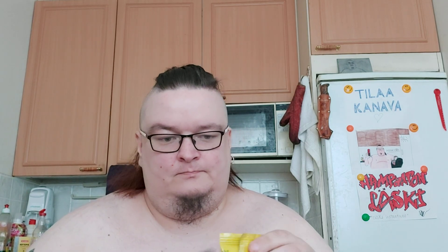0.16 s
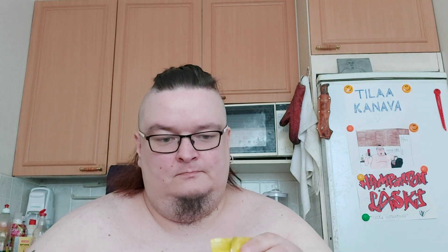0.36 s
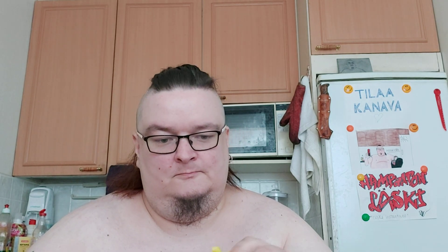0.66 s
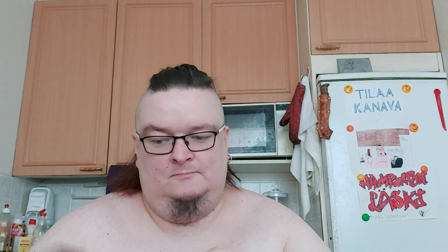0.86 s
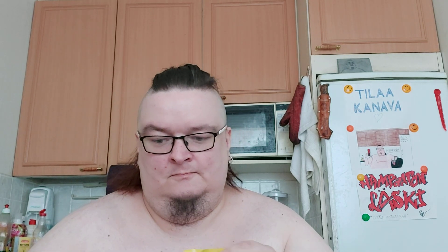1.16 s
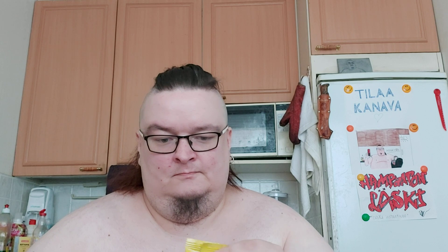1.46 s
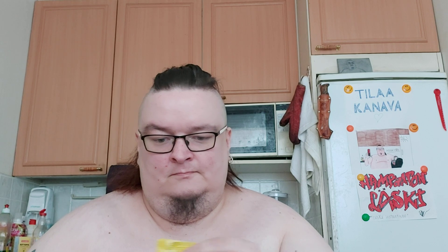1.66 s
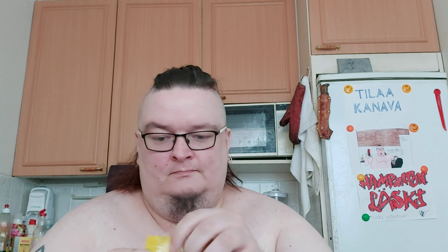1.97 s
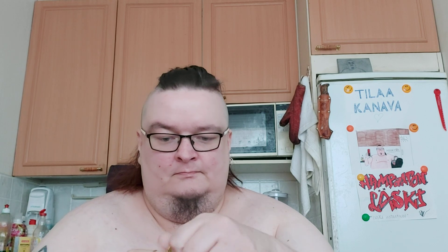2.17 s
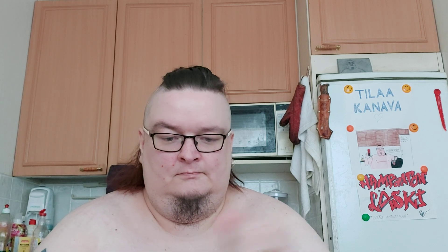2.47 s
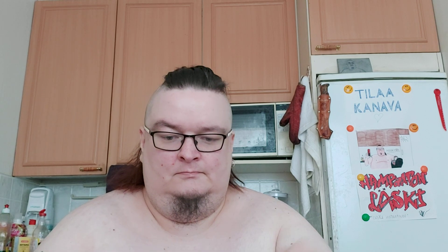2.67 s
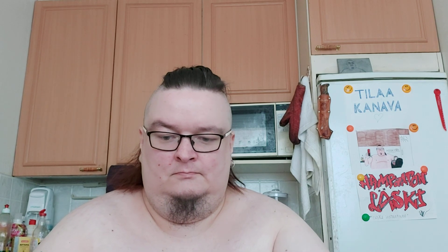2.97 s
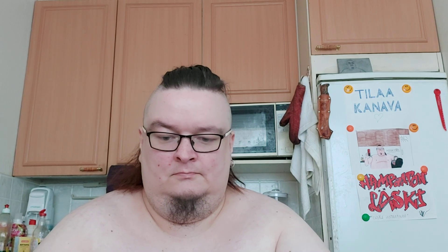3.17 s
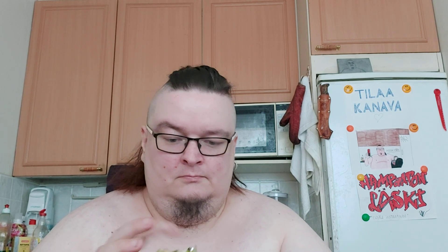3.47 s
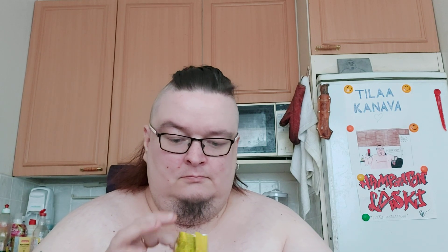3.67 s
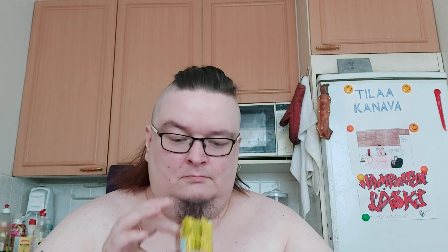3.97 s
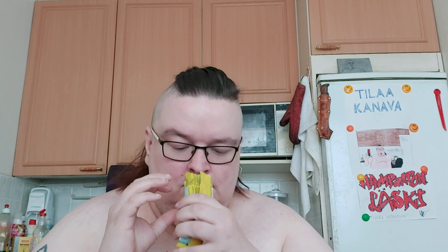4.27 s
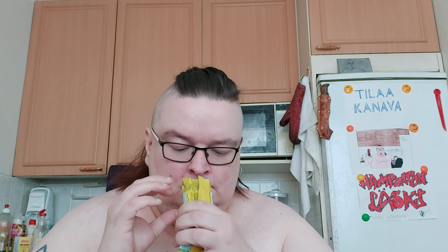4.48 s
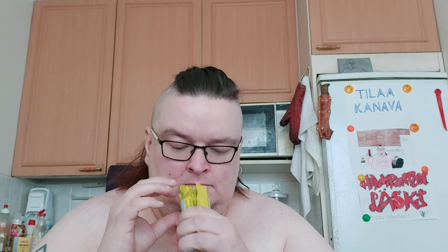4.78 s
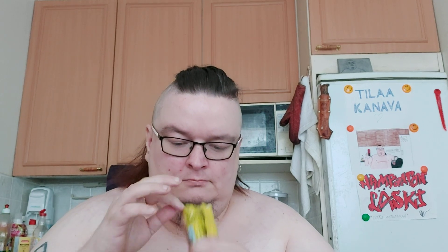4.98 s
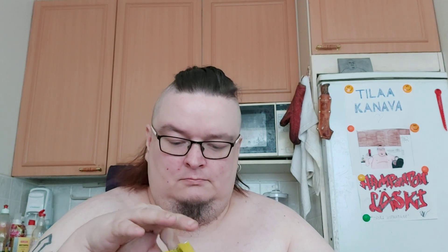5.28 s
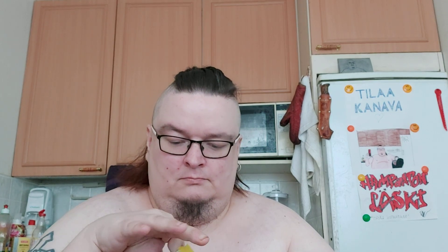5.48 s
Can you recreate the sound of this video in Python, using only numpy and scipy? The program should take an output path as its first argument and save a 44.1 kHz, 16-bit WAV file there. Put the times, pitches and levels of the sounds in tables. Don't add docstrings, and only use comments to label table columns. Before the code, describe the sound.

A plastic snack wrapper crackles and snaps close by as it is cut and torn open, with a knife clunking onto the table.

```python
import sys
import numpy as np
from scipy import signal
from scipy.fft import rfft, irfft, next_fast_len
from scipy.io import wavfile
from scipy.ndimage import uniform_filter1d, map_coordinates

SR = 44100
rng = np.random.default_rng(int(sys.argv[2]) if len(sys.argv) > 2 else 0)


def output_pcm(signal):
    pcm = np.clip(np.atleast_2d(signal).T, -1, 1) * 32767
    wavfile.write(sys.argv[1], SR, np.round(pcm).astype(np.int16))


def ratio(d):
    e = np.asarray(d, float) / 20
    return 10 ** e


N = 247968

# t/s, level/dB
FRIDGE_LEVEL = [(0.0, -58), (0.7, -53), (2.0, -54), (4.57, -52.5), (5.29, -52), (5.62, -46.5)]
# f/Hz, density/(dB per Hz)
DRONE_SPECTRUM = [(38, -48.5), (65, -10.5), (102, -22.5), (162, -9), (327, -11), (361, -4), (480, -39),
                  (1060, -120)]
# f/Hz, density/(dB per Hz)
AIR_SPECTRUM = [(260, -35.5), (450, -3), (1050, -3), (2000, -9.5), (3000, -16.5), (4500, -43), (8000, -34),
                (16000, -42.5)]
# t/s, level/dB
SQUEEZE_LEVEL = [(0.1, -60), (0.39, -57), (0.66, -48), (0.78, -36), (0.95, -39), (1.08, -64.5), (1.42, -43),
                 (1.67, -76.5), (2.08, -50.5), (2.44, -36), (2.63, -42.5), (3.2, -59.5), (3.46, -48.5),
                 (3.7, -58), (3.84, -61), (4.29, -66.5), (5.37, -54), (5.62, -42.5)]
# f/Hz, density/(dB per Hz)
FILM_SPECTRUM = [(500, -41.5), (900, -8.5), (1250, -8.5), (1900, -3), (4500, -5.5), (7000, -8),
                 (11000, -28.5), (16000, -31)]
# f/Hz, density/(dB per Hz)
FIZZ_SPECTRUM = [(4000, -50.5), (6200, -15), (7600, 5), (9000, 2.5), (12000, 3.5), (15500, -2),
                 (17000, -54)]
# f/Hz, bandwidth/Hz, level/dB
PACK_MODES = [(260, 290, -4), (374.5, 212, 8.5), (501, 153, 10.5), (780, 370, 2), (1120, 240, -2.5)]
# t/s, level/dB
GRIP_LEVEL = [(0, -0.5), (.6, 0.5), (.8, -7.5), (1.3, -0.5), (2.5, -3), (4, -2), (5.62, -3)]
# t/s, peak level/dB, facet f/Hz, fizz level/dB
CUTTING_SNAPS = [(0.0288, -44, 2580, -16.5), (0.0427, -44, 6890, 13), (0.0718, -26.5, 6600, 7),
                 (0.0834, -36.5, 5000, 1), (0.0887, -30.5, 1870, -8.0), (0.1005, -35, 1810, -11),
                 (0.2061, -41, 4500, 6), (0.2524, -39, 1200, 2), (0.2766, -45.5, 1510, -12),
                 (0.298, -30.0, 5120, 2), (0.3023, -30.5, 5040, 7.0), (0.3113, -36.5, 2760, -5),
                 (0.3889, -35.5, 1510, -4), (0.4078, -35, 3270, -3), (0.4323, -21.5, 4500, 1.5),
                 (0.4402, -31, 3920, 5), (0.4879, -23, 1730, 0.5), (0.5013, -23.5, 1850, 4),
                 (0.511, -24.5, 1890, -4), (0.5147, -23.5, 1680, -16), (0.52, -23, 1700, 1.5),
                 (0.5271, -25.5, 1580, -8.0), (0.5487, -25.5, 2440, -1), (0.5528, -26, 3190, 3),
                 (0.5737, -29, 4350, 7), (0.586, -25, 1620, -6), (0.6147, -36, 3100, -16),
                 (0.6324, -12.5, 1630, -4), (0.6408, -28.5, 1365, -9.5), (0.6604, -22.5, 1470, -3),
                 (0.6783, -21, 3060, -7), (0.708, -35, 3170, -9), (0.7311, -21, 1850, -7),
                 (0.7384, -25, 3320, -2.5), (0.754, -17, 2560, -6.0), (0.7685, -16, 3880, 2),
                 (0.7775, -12, 2850, -15), (0.7827, -15, 4900, 6), (0.7886, -8.5, 1800, -7.0),
                 (0.7975, -11.5, 1860, 4), (0.8092, -10.0, 2590, -5.5), (0.8117, -9, 3320, -10.5),
                 (0.8198, -17.0, 2200, -5), (0.8276, -23, 2000, 2), (0.8357, -19.5, 1770, 4.5),
                 (0.847, -16, 1756, -0.5), (0.864, -19, 1930, 5), (0.871, -21.5, 6160, -1.5),
                 (0.8922, -23.0, 2850, -7)]
# t/s, peak level/dB, facet f/Hz, fizz
# level/dB
HANDLING_SNAPS = [(0.9098, -27.5, 1870, -10.5), (0.9172, -20.5, 2890, -8.5), (0.9318, -26.5, 2280, -7.0),
                  (0.9401, -25, 2365, -11.5), (0.9449, -27.5, 2170, -2), (0.9499, -25.5, 1884, -12),
                  (0.9613, -21, 3190, -15), (0.9815, -29.5, 1770, -13), (1.0106, -21.5, 5350, -4.5),
                  (1.0284, -27, 3750, -5.5), (1.0343, -25, 2160, -5), (1.0615, -30, 1570, -8),
                  (1.0801, -31, 3190, -4), (1.0895, -27.5, 1970, -7), (1.1115, -26.5, 2880, -13),
                  (1.2106, -35.5, 1450, -12), (1.3001, -26.5, 2710, -8), (1.3088, -38, 2760, -17),
                  (1.314, -34, 2790, 5.5), (1.3311, -24, 1186, -14), (1.3473, -22, 1590, -19),
                  (1.3531, -31, 1600, -5), (1.3662, -16, 1790, -0.5), (1.3736, -30.5, 1493, 1.5),
                  (1.5809, -41, 1770, -15), (1.662, -27.5, 1850, -7.5), (1.6811, -37.0, 1210, -10.5),
                  (1.6963, -26, 1660, -3), (1.8164, -28.0, 3920, -4), (1.8249, -48, 3920, -6.0),
                  (1.8381, -28.0, 2650, -2.5), (1.8462, -30.5, 2070, -11.0), (1.8561, -32.5, 3620, -9),
                  (1.8696, -26.5, 1707, -9.5), (1.8819, -22, 3210, -2), (1.8911, -17, 1980, -1.5),
                  (1.9, -20, 3660, -2.5), (1.9081, -23.5, 2210, 2.5), (1.9183, -13, 1740, -5.5),
                  (1.9236, -21, 3460, -5.5), (1.9306, -12.5, 5020, -5.5), (1.9406, -29, 2510, -3.5),
                  (1.97, -24.5, 1680, -3.5), (1.9778, -32, 3360, -5), (1.993, -25.5, 4590, -3.5),
                  (1.9994, -18, 6000, -4), (2.0064, -31, 2230, -5), (2.0188, -29, 2780, -13.5),
                  (2.0255, -22.5, 4670, -9),
                  (2.0425, -29.5, 5080, -14), (2.054, -35.5, 3170, 0), (2.058, -29.5, 1764, -6.5),
                 (2.069, -21.5, 2850, -10), (2.074, -26.5, 4920, 1), (2.1208, -37, 1677, -4.5),
                 (2.1255, -28, 1735, -11), (2.1436, -24.5, 2010, -18), (2.1522, -23, 1780, 0),
                 (2.175, -32, 6160, -2.5), (2.1856, -22.5, 2510, -1), (2.1928, -20.5, 2530, -3.5),
                 (2.199, -28.5, 6950, 9.5), (2.221, -23, 2370, 5), (2.2323, -15, 6180, -8),
                 (2.2396, -28.5, 5300, 4), (2.25, -17.5, 2870, -1), (2.2598, -21.5, 2780, -9),
                 (2.2683, -21.5, 2000, -1), (2.276, -20, 2240, 1.0), (2.2986, -20, 2890, -6.5),
                 (2.3117, -20, 2630, -3.5), (2.337, -34.0, 5680, 16), (2.3733, -22, 1865, -16),
                 (2.3783, -26, 2620, -3.5), (2.3889, -21.5, 2970, 0.5), (2.4012, -25.5, 4530, -5),
                 (2.4208, -20.5, 5510, 3.5), (2.4301, -21.0, 4610, 0), (2.4483, -29, 5470, 3.5),
                 (2.4606, -36, 2530, -6.5), (2.4941, -9, 1970, -1.5), (2.506, -11, 1940, 0.5),
                 (2.5102, -9.5, 1844, -16), (2.523, -4.5, 4180, 0), (2.5323, -21, 2500, -4.5),
                 (2.5411, -28.5, 2000, -3.5), (2.552, -8.5, 1700, -5), (2.5602, -11.5, 5040, 2),
                 (2.5699, -17.5, 2860, 4), (2.731, -34, 3460, 6.5), (2.7458, -32, 5000, 3),
                 (2.7583, -40, 2720, -8), (2.766, -27, 1890, -18.5), (2.776, -30.5, 1830, -6.0),
                 (2.7971, -45.5, 2000, -2.5), (2.8142, -32, 4240, -9), (2.8253, -35.5, 1560, 5),
                 (2.8384, -33, 2740, 1),
                  (2.8634, -40, 4220, 3), (2.8682, -30, 2770, -9.5), (2.8736, -29.5, 6660, 8),
                 (2.8858, -24.5, 5440, 5), (2.8957, -35, 5680, 3), (2.902, -26.5, 7000, 7.5),
                 (2.911, -37, 5990, 0), (2.976, -41, 1384, 0), (2.987, -31.5, 6300, 3.5),
                 (3.028, -33.5, 1610, -22), (3.0693, -37.0, 1810, -9), (3.096, -38, 1640, 5),
                 (3.1787, -33.5, 3350, 3), (3.202, -37.5, 1465, 2.5), (3.2094, -37, 6980, 1),
                 (3.226, -33.5, 2840, -10), (3.2344, -24.5, 4220, 0.5), (3.243, -39.5, 5600, -4.5),
                 (3.2678, -33.5, 1890, -5.5), (3.3246, -42, 1820, -20), (3.3438, -28.5, 1900, -11),
                 (3.3527, -30, 1980, -2), (3.363, -27.5, 1850, -3.5), (3.3745, -20, 1810, -7.5),
                 (3.3795, -18.5, 1854, -6), (3.3873, -26, 1920, -7.5), (3.4051, -23.5, 1834, -20),
                 (3.4156, -15, 4780, -7.5), (3.4259, -26, 4400, -7), (3.4316, -19.5, 6000, 0.0),
                 (3.439, -25, 1600, -17), (3.4702, -29.5, 2630, -18), (3.4818, -22.0, 1953, -13.5),
                 (3.4953, -17, 1910, -10), (3.5051, -23, 1865, -1.5), (3.5169, -19.5, 1785, -1),
                 (3.525, -29.5, 2104, -14), (3.5417, -33, 1720, -12.5), (3.5488, -31, 1825, -14),
                 (3.5732, -24.5, 1850, -4), (3.6, -28.5, 1824, -22), (3.6079, -36, 1880, -28),
                 (3.6181, -23, 1690, -5), (3.6276, -28, 1790, -6), (3.634, -22.5, 1900, -3.5),
                 (3.651, -31, 2020, -6.0), (3.66, -22.5, 1866, -10), (3.6668, -30, 1323, -17.5),
                 (3.678, -31.5, 1890, -19),
                  (3.6898, -16, 1890, 2), (3.7011, -17.5, 2150, -4), (3.7137, -20.5, 1420, -5),
                 (3.7269, -19, 1820, -4.5), (3.7356, -25, 1590, -2.0), (3.7472, -21, 1810, -19),
                 (3.761, -28, 1850, -15), (3.7643, -32, 1810, -8.5), (3.778, -20.5, 2720, 0.5),
                 (3.879, -29.5, 5800, -9), (3.8939, -35, 1890, -24), (4.026, -28, 1810, -30),
                 (4.0343, -34.5, 1810, -13), (4.0454, -35, 1850, -20.5), (4.0687, -24.5, 1700, -13),
                 (4.0749, -29.5, 2750, -4), (4.0908, -20, 1850, -11.5), (4.1908, -33, 4690, -1.5),
                 (4.335, -45.5, 1215, 0), (4.4347, -34, 1230, -12.5), (4.5296, -46, 3000, -5.5),
                 (4.6552, -46, 1616, -27.5), (4.7373, -48, 1550, -29), (4.7473, -44, 1950, -26),
                 (4.9311, -28.5, 1850, -5.5), (4.9444, -24.5, 2420, -8.5), (4.9538, -29, 2380, -6),
                 (4.959, -27.5, 2820, -7), (4.97, -28, 1290, -8), (5.0762, -41, 1460, -25.0),
                 (5.2023, -31, 2000, -2), (5.3364, -31, 1940, -15.5), (5.3758, -31.5, 1960, -18),
                 (5.3954, -30, 1890, -18.5), (5.4037, -23, 2020, -18.0), (5.4181, -20, 2540, -10),
                 (5.4243, -20, 2530, -17), (5.4301, -28.5, 1670, -13), (5.45, -34, 2580, -2),
                 (5.4547, -19.5, 2840, -8), (5.4652, -24.0, 2800, -12), (5.4732, -14, 2680, 4),
                 (5.4814, -20.5, 4950, -5), (5.5041, -23.5, 1770, -11), (5.5175, -22, 1890, -14),
                 (5.5273, -33, 1340, -14.0), (5.567, -28, 2820, -15), (5.5881, -27, 3010, -12),
                 (5.5975, -32, 1260, -7), (5.6088, -26, 2680, -22)]
# t/s, peak level/dB, facet f/Hz, fizz level/dB
KNIFE_SNAPS = [
    (1.593, -23.5, 1450, -28),
    (1.6065, -33.5, 1770, -30),
    (1.6172, -33.5, 1510, -30),
    (1.6295, -36, 2100, -30),
]
# f/Hz, density/(dB per Hz)
BLADE_SPECTRUM = [(1800, -42), (2600, -12), (2870, -4), (3100, -12), (3500, -23), (5000, -58)]
# t/s, length/s, level/dB
RUB_EVENTS = [
    (1.153, 0.29, -54.5),
    (3.586, 0.63, -49.5),
    (5.391, 0.25, -52),
]
# f/Hz, density/(dB per Hz)
RUB_SPECTRUM = [(70, -30), (120, -8), (180, 0), (280, -2), (400, -8), (600, -35)]
# t/s, peak level/dB, hardness level/dB, weight level/dB
TABLE_BLOWS = [
    (1.3303, -35, 5, 10),
    (1.5911, -9, 1, 2),
    (1.6125, -14.5, 2, 0.5),
    (2.4961, -29.5, -19, -21),
    (2.5622, -21, -9, -30),
]
# f/Hz, level/dB, t60/s
TABLE_MODES = [(81, -6, .2), (124, -7, .22), (170, -13, .2), (240, -4, .25), (324, 0, .22), (402, -5, .22),
               (487, -7, .22), (535, -9, .22), (597, -6, .22), (642, -6, .25), (810, -8, .2),
               (921, -13, .2), (1060, -17, .2)]
# f/Hz, density/(dB per Hz)
RATTLE_SPECTRUM = [(300, -10), (700, -1), (1000, -6), (1450, -13.5), (2500, -20.5), (4000, -43.5),
                   (6000, -59.5)]
# delay t/s, level/dB
WALL_ECHOES = [(.0021, -5.5), (.0048, -6), (.009, -3), (0.015, -14), (.018, -31.5), (.025, -27)]
# f/Hz, t60/s
KITCHEN_T60 = [(150, 0.47), (600, 0.16), (2000, 0.25), (6000, 0.19), (14000, 0.16)]
# f/Hz, likeness/1
COHERENCE = [(60, 1), (150, 0.97), (300, 0.7), (950, 0.1), (3770, 0.055), (15000, .05)]
# f/Hz, left-right level/dB
PORT_BALANCE = [(40, 4), (130, 3.5), (1000, 2), (3000, 0), (8000, -1), (13000, 5)]


def unit(x):
    return x / np.sqrt(np.mean(x ** 2) + 1e-20)


def along(points, hz):
    f, v = np.transpose(points)
    return np.interp(np.log(hz + 1), np.log(f + 1), v)


def curves(rows):
    s, *cols = np.transpose(rows)
    return [np.interp(np.arange(N) / SR, s, c) for c in cols]


def wobble(rate):
    knots = rng.standard_normal(int(N * rate / SR) + 4)
    return map_coordinates(knots, [np.arange(N) * rate / SR])


def filtered(x, response):
    m = next_fast_len(N + SR // 2)
    return irfft(rfft(x, m) * response(np.fft.rfftfreq(m, 1 / SR)), m)[..., :N]


def coloured(x, spectrum):
    hz = np.fft.rfftfreq(2048, 1 / SR)
    cepstrum = irfft(np.log(ratio(along(spectrum, hz)) + 1e-5))
    cepstrum[1:1024] *= 2
    cepstrum[1025:] = 0
    pulse = irfft(np.exp(rfft(cepstrum)))
    return signal.fftconvolve(x, pulse[None] / np.linalg.norm(pulse), axes=1)[:, :N]


def placed(s, shapes):
    starts = np.round(s * SR).astype(int)[:, None]
    at = (starts + np.arange(shapes.shape[2])).ravel()
    return np.array([np.bincount(at, c.ravel(), N + SR)[:N] for c in shapes])


def bursts(t60, size, alike):
    noise = rng.standard_normal((len(t60), 3, size)).transpose(1, 0, 2)
    share, t = np.clip(alike, 0, 1), np.arange(size) / SR
    swell = 1 - np.exp(-(t / (0.091 * t60)) ** 2)
    shape = ratio(-60 * t / t60) * swell
    pair = (np.sqrt(share) * noise[0] + np.sqrt(1 - share) * noise[1:]) * shape
    energy = np.linalg.norm(shape, axis=-1, keepdims=True)
    return pair * energy / np.linalg.norm(pair, axis=-1, keepdims=True)


def likeness(pair):
    m = next_fast_len(pair.shape[1])
    coherence = np.clip(along(COHERENCE, np.fft.rfftfreq(m, 1 / SR)), -1, 1)
    turn = np.arccos(coherence) / 2
    mid, side = irfft(rfft(pair, m) * [np.cos(turn), np.sin(turn)], m)[:, :pair.shape[1]]
    return np.array([mid + side, mid - side])


def rush(spectrum, patchy_db):
    z = signal.stft(rng.standard_normal((2, N)), nperseg=512)[2]
    field = uniform_filter1d(rng.standard_normal(z.shape[1:]), 4, 0)
    field = uniform_filter1d(field, 10, 1)
    pair = signal.istft(z * ratio(patchy_db * unit(field)), nperseg=512)[1][:, :N]
    return unit(likeness(filtered(pair, lambda hz: ratio(along(spectrum, hz)))))


def fridge():
    motor_hz, whine_hz = 49, 360
    drone_db, = curves(FRIDGE_LEVEL)
    motor_db, air_db = drone_db - 13, drone_db - 6.5
    t = np.arange(N) / SR
    motor_phase = 2 * np.pi * motor_hz * t + 0.4 * wobble(4)
    motor = ratio(motor_db + 7 + 2 * wobble(3)) * np.sin(motor_phase)
    whine_phase = 2 * np.pi * whine_hz * t + 0.3 * wobble(1.3)
    whine = ratio(drone_db - 16 + 1.1 * wobble(2.7)) * np.sin(whine_phase)
    drone = ratio(drone_db - 2) * rush(DRONE_SPECTRUM, patchy_db=0.8)
    air = ratio(air_db + 4.5) * rush(AIR_SPECTRUM, patchy_db=2.6)
    return motor + whine + drone + air


def crackle():
    crackle_db, = curves(SQUEEZE_LEVEL)
    fizz_db = crackle_db - 7.5 + 0.62 * (crackle_db + 39)
    luck = rng.random((3000, 2))
    size = ratio(-3.5 * np.log(luck[:, 1:] + 0.02))
    shapes = size * bursts(np.full_like(size, 0.004), size=128, alike=0.48)
    grains = placed(luck[:, 0] * N / SR, shapes)
    grains = grains * ratio(3.5 * wobble(25))
    film = ratio(crackle_db - 13.5) * unit(coloured(grains, FILM_SPECTRUM))
    fizz = ratio(fizz_db - 10.5) * unit(coloured(grains, FIZZ_SPECTRUM))
    return film + fizz


def creases():
    lead_s, trail_s = -0.004, 0.03
    big = np.array(CUTTING_SNAPS + KNIFE_SNAPS + HANDLING_SNAPS)
    luck = rng.random((len(big), 3, 3))
    s = big[:, :1] - lead_s + (lead_s + trail_s) * luck[..., 0]
    s = np.clip(s, 0, N / SR)
    db = big[:, 1:2] - 14 - 12 * luck[..., 1]
    hz = big[:, 2:3] * (0.643 + 0.73 * luck[..., 2])
    fizz_db = big[:, 3:] + 0 * s
    small = np.stack([s, db, hz, fizz_db], -1).reshape(-1, big.shape[1])
    return np.concatenate([big, small]).T[:, :, None]


def packet(f):
    total = 0
    for k, (centre, width, db) in enumerate(PACK_MODES):
        damping = 1j * f * width
        total = total + (-1) ** k * ratio(db) * damping / (centre * centre - f * f + damping)
    return total


def snaps():
    s, db, hz, fizz_db = creases()
    start, size, t = s[:, 0], ratio(db), np.arange(320) / SR
    life = 0.011 * ratio(0.17 * (db + 27))
    dull = np.clip(-fizz_db / 22, 0, 1)

    decay = ratio(-60 * t * hz / 14)
    ring = np.sin(2 * np.pi * hz * t) * decay * (1 - np.exp(-t / 0.0001))
    facet = ratio(-4.5) * placed(start, (size * ring)[None])

    crack = bursts(life, size=320, alike=0.44)
    crack = (1 - dull) * crack + 0.88 * dull * uniform_filter1d(crack, size=6)
    crack = coloured(placed(start, size * crack), FILM_SPECTRUM)

    fizz = size * ratio(fizz_db) * bursts(0.65 * life, size=320, alike=0.058)
    fizz = coloured(placed(start, fizz), FIZZ_SPECTRUM)

    sign = np.sign(rng.standard_normal(size.shape))
    nudge = (1 - dull) * np.eye(6)[0] + 0.23 * dull
    flips = placed(start, (size * sign * nudge)[None])
    pack = ratio(10.5 + curves(GRIP_LEVEL)[0]) * filtered(flips, packet)

    film_flips = placed(start, (size * (1 - 0.85 * dull))[None])
    fizz_flips = placed(start, (size * ratio(fizz_db))[None])
    all_round = ratio(8.5) * coloured(film_flips, FILM_SPECTRUM)
    all_round = all_round + ratio(5.5) * coloured(fizz_flips, FIZZ_SPECTRUM) + ratio(-2) * facet + pack
    return ratio(-1.5) * crack + facet + ratio(-2.5) * fizz + pack, all_round


def slide():
    start_s, length_s, level_db = 1.08, 0.4, -54.5
    progress = np.clip((np.arange(N) / SR - start_s) / length_s, 0, 1)
    swell = np.sin(np.pi * progress) ** 0.6
    return ratio(level_db + 1.5 * wobble(15)) * swell * rush(BLADE_SPECTRUM, patchy_db=-0.5)


def rubs():
    t = np.arange(N) / SR
    swell = np.zeros(N)
    for s, length, db in RUB_EVENTS:
        swell += ratio(db) * np.sin(np.pi * np.clip((t - s) / length, 0, 1))
    return swell * ratio(1.2 * wobble(12)) * rush(RUB_SPECTRUM, patchy_db=1)


def table():
    low, edge, t = np.zeros(N + SR), np.zeros((2, N + SR)), np.arange(SR // 2) / SR
    push_s, push_hz = 0.0022, 370
    u = t / push_s
    push = np.cos(2 * np.pi * push_hz * (t - push_s)) * u ** 3 * np.exp(3 - 3 * u)
    onset = 1 - np.exp(-(t / 0.0029) ** 2)
    shake = ratio(-60 * t / 0.02) + ratio(1 - 60 * t / 0.28)
    for s, db, hard_db, weight_db in TABLE_BLOWS:
        ring = np.zeros(len(t))
        for hz, level, t60 in TABLE_MODES:
            decay = ratio(level + weight_db * (hz < 200) - 60 * t / t60)
            ring += decay * np.sin(2 * np.pi * hz * t + rng.uniform(0, 2 * np.pi))
        start = round(s * SR)
        low[start:][:len(t)] += ratio(db) * (ratio(-15) * ring * onset + push)
        noise = likeness(rng.standard_normal((2, len(t))))
        edge[:, start:][:, :len(t)] += ratio(db + hard_db - 19.5) * shake * noise
    return low[:N] + coloured(edge, RATTLE_SPECTRUM)


def kitchen(x, spread, wall_db, tail_db):
    out, step = np.zeros((2, N + SR)), 4096
    for delay, db in WALL_ECHOES:
        out[:, round(delay * SR):][:, :N] += ratio(wall_db + db) * x[::-1]
    for start in range(0, N, step):
        hz, t, z = signal.stft(rng.standard_normal((2, SR // 3)), SR, nperseg=256)
        decay = ratio(-60 * t / along(KITCHEN_T60, hz)[:, None])
        tail = signal.istft(z * decay, SR, nperseg=256)[1]
        tail_t = np.arange(tail.shape[1]) / SR
        tail = likeness(tail * (1 - np.exp(-(tail_t / 0.006) ** 2)))
        tail = tail / np.linalg.norm(tail[0])
        mono = spread[:, start:start + step].mean(0)[None]
        wet = signal.fftconvolve(mono, tail, axes=1)
        out[:, start:][:, :wet.shape[1]] += ratio(tail_db) * wet
    return out[:, :N]


def scene():
    wrapper, all_round = snaps()
    fine = crackle()
    blows = table()
    early = wrapper + fine + ratio(-12.5) * blows
    diffuse = all_round + fine + ratio(-8.5) * blows
    room = kitchen(early, diffuse, wall_db=-11, tail_db=-0.5)
    return wrapper + fine + blows + room + fridge() + rubs() + slide()


def roll_off(x):
    return signal.sosfilt(signal.butter(12, 16980, fs=SR, output="sos"), x)


def record(dry):
    def ports(hz):
        balance = ratio(np.outer([0.5, -0.5], along(PORT_BALANCE, hz)))
        bass_cut = (1j * hz / (33 + 1j * hz)) ** 2 * (hz > 34)
        return balance * bass_cut

    def band_limit(hz):
        return (hz < 16950) * ratio(-24 * (hz > 15950))

    x = filtered(dry, ports)
    x = x / (1 + np.abs(x / 0.7) ** 3) ** (1 / 3)
    mix = filtered(x, band_limit)
    return roll_off(mix)


dry = scene()
out = record(dry)
output_pcm(out)
```